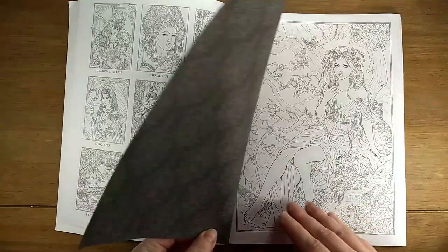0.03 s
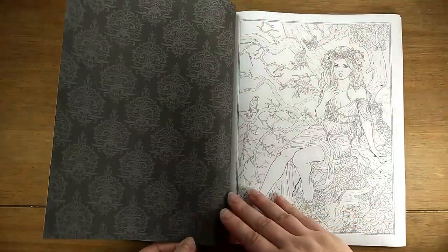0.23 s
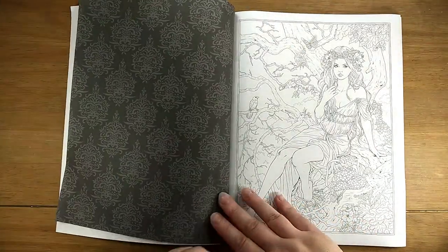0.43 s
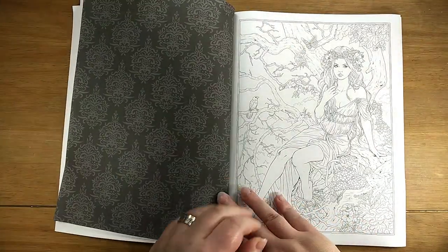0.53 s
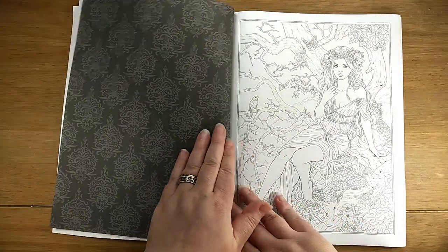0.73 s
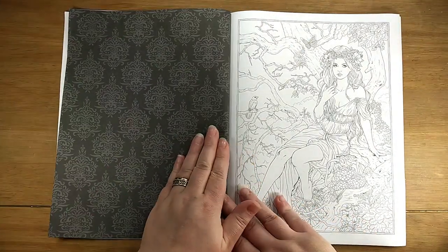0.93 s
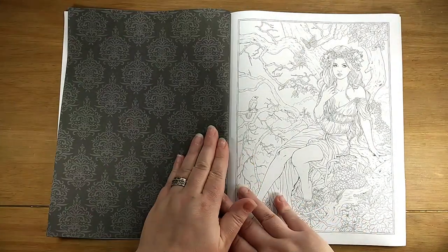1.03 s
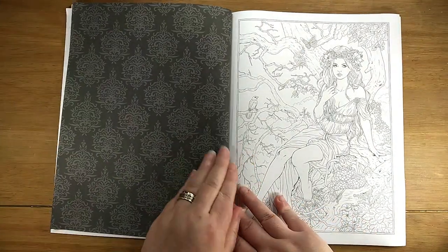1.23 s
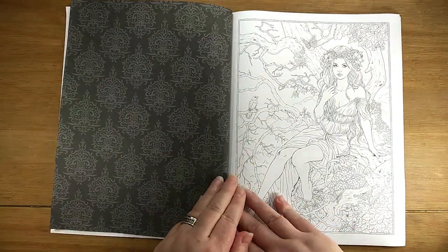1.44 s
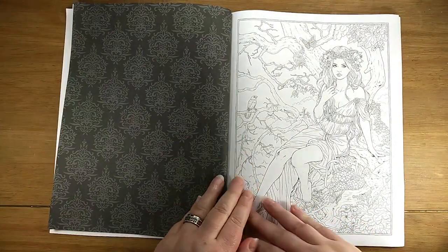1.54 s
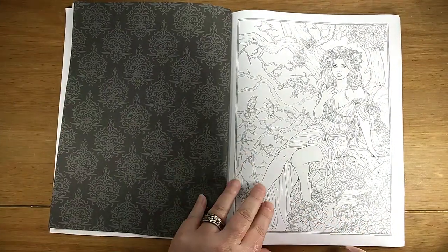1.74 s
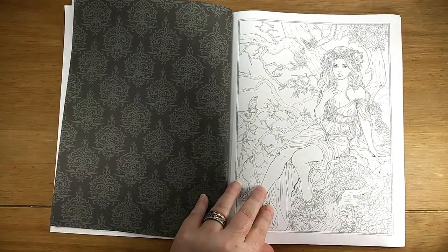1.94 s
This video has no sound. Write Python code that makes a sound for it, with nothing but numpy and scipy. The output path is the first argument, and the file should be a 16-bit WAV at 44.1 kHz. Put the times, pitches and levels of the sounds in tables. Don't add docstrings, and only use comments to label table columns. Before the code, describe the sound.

Page turn in a book: brief rustle, crisp tap, then light finger bumps and faint rubbing

```python
import sys
import numpy as np
from scipy import signal
from scipy.fft import rfft, irfft
from scipy.io import wavfile
from scipy.ndimage import uniform_filter1d

SR = 44100
rng = np.random.default_rng(int(sys.argv[2]) if len(sys.argv) > 2 else 0)


def put_to_file(sound):
    columns = np.atleast_2d(sound).T
    safe = np.clip(columns, -1, 1)
    whole_steps = np.round(safe * 32767)
    wavfile.write(sys.argv[1], SR, whole_steps.astype(np.int16))


def nominal_scale(level):
    x = np.asarray(level, float) / 20
    return 10 ** x


N = 88200

# frequency in Hz, density in dB per Hz.
AIR_SPECTRUM = [(30, -25.5), (80, -28.5), (300, -5), (600, -8.5), (1000, -11.5), (4500, -18.5),
                (7800, -31.5), (10000, -23.5)]
# frequency in Hz, density in dB per Hz.
SCRAPE_SPECTRUM = [(1200, -35), (2200, -6), (4000, -6), (4700, 1), (5300, -6), (6500, -4), (7500, -17),
                   (9000, -31)]
# frequency in Hz, density in dB per Hz.
SHEET_SPECTRUM = [(100, -43), (200, -13), (350, 3), (520, -4), (870, 5), (1150, 0.5), (1900, -1),
                  (3200, -21.5)]
# frequency in Hz, density in dB per Hz.
SKIN_SPECTRUM = [(6000, -20.5), (8000, -7.5), (9800, -1.5), (12500, -3.5), (16000, -8)]
# frequency in Hz, level in dB, T60 in seconds.
EDGE_MODES = [(1560, -2.5, 0.00433), (2156, -20, 0.0048), (2755, 3, 0.008), (3500, 8.5, 0.0056),
              (4536, -1.5, 0.0096), (5000, 2.5, 0.0046), (6200, -8, 0.0086), (7220, -16, 0.0031),
              (9600, -19, 0.0046)]
# start in seconds, peak in dB, pitch of
# the hollow in Hz, relative tick in dB.
CONTACTS = [(.098, -44.5, 334, -10), (.2038, -33.5, 406, -9), (.2255, -30, 1900, -5), (.2295, -31.5, 815, -17),
            (.2362, -72, 890, -3), (.243, -42, 1430, 1), (.302, -50.5, 1500, -1), (.355, -40.5, 794, -2),
            (.379, -25, 706, 16.5), (.38, -14, 1080, 1), (.3828, -28, 1000, 7.5), (0.3877, -32, 1040, 6),
            (0.3908, -35, 1377, 9), (0.3981, -32.5, 897, -7.5), (.468, -52, 725, 0.5), (.7434, -74, 910, -2),
            (.7572, -40, 776, -17), (.78, -44, 290, -9), (0.8588, -40, 1280, 4.5), (.8603, -36.5, 2420, -6),
            (.862, -38, 970, -0.5), (0.952, -54.5, 960, -26), (1.1676, -46.5, 1060, 0),
            (1.1802, -44.5, 1040, 6), (1.185, -42, 1010, -1), (1.2202, -42, 970, -18), (1.442, -53.5, 940, -3),
            (1.515, -56, 990, 12), (1.587, -52, 1040, -7), (1.789, -53, 1600, -4),
            (.2205, -38, 2170, 3),
    (.24, -41, 2300, -3),
    (.27, -50, 2620, 12),
    (1.413, -67, 2480, 10),
    (1.457, -66, 2500, 15),
    (1.469, -60.5, 2880, 11),
    (1.7905, -52.5, 2500, -9),
    (1.792, -56.5, 795, -12),
]
# time in seconds, level in dB, relative drumming of the sheet in dB, relative skin hiss in dB.
TURN_STROKES = [
    [(0, -64.5, -14.5, -9), (.05, -64, 4, -11), (.1, -61, -2, -4), (.14, -60, -4.5, -28),
     (.175, -66, -2.5, -3), (.197, -57, -2.5, -19)],
    [(.197, -52, -11, -18), (.204, -45, -9, -12), (.215, -43, -6.5, -10), (.232, -41.5, 6, -27.5),
     (.252, -47.5, -5, -9), (.29, -47.5, -13, -11), (.305, -52.5, 3.5, -8.5), (.35, -47.5, -7.5, -15),
     (.378, -63.5, 9.5, -27)],
    [(.4, -55, -13, -19), (.49, -75.5, -17, -18.5), (.56, -72, -0.5, -21.5), (.72, -83, 6, -16.5)],
]
# time in seconds, level in dB, relative drumming of the sheet in dB, relative skin hiss in dB.
SMOOTH_STROKES = [
    [(.7432, -50.5, -6, -16), (.752, -59.5, 2.5, -9), (.757, -50.5, -4.5, -11), (.778, -48.5, -6.5, -16),
     (.79, -51, -9, -12), (.802, -79.5, 8, -9), (.825, -62, 7, -25), (.855, -65, 4.5, -12),
     (.9, -76, 9, -12)],
    [(1.19, -61, -4, -9), (1.21, -70, 3.5, -5), (1.3, -63.5, -5.5, -4.5), (1.38, -70.5, 0, -2),
     (1.45, -64, -6, -11.5), (1.54, -65, 1, -5), (1.595, -65.5, -4, -5), (1.69, -68.5, -3, -0.5),
     (1.76, -73.5, -15, -11)],
]
# time in seconds, level in dB, relative drumming of the sheet in dB, relative skin hiss in dB.
SHIFT_STROKES = [
    [(1.03, -88, -5, -3), (1.05, -73.5, 4, -4), (1.16, -81, -2, -3)],
    [(1.76, -76, 2, -8), (1.8, -72, -2, -12), (1.9, -75.5, 5, -12), (1.92, -94, -1, -10)],
]


def unit(x):
    return x / np.sqrt(np.mean(x ** 2))


def bin_hz():
    return np.maximum(np.arange(N // 2 + 1) * SR / N, 1)


def colour(x, points):
    hz, db = np.array(points, float).T
    gain = nominal_scale(np.interp(np.log(bin_hz()), np.log(hz), db))
    return irfft(rfft(x) * gain, N)


def walk(rate):
    hold = int(SR / rate)
    steps = rng.standard_normal(N)[np.arange(N) // hold]
    return 0.82 * uniform_filter1d(uniform_filter1d(steps, hold), hold)


def uneven_sizes(spread_db, count):
    chance = rng.random((2, count))
    return nominal_scale(-spread_db * np.log(chance[0] + 1e-9)) * np.sign(chance[1] - 0.5)


def air():
    level_db, swell_db, flicker_db = -65, 0.2, 1.93
    swell = walk(3.42)
    octaves = np.log2(bin_hz())
    out = np.zeros(N)
    for octave in np.arange(4, 15):
        share = np.cos(np.pi / 2 * np.clip(octaves - octave, -1, 1))
        noise = colour(rng.standard_normal(N), AIR_SPECTRUM)
        band = irfft(rfft(noise) * share, N)
        out += band * nominal_scale(swell_db * swell + flicker_db * walk(6.7))
    return unit(out) * nominal_scale(level_db)


def room(x):
    level_db, t60_s, gap_s, spread_db = -7, 0.14, 0.00194, 3.0
    low_hz, top_hz = 1600, 7640
    t = np.arange(SR // 2) / SR
    echo = uneven_sizes(spread_db, len(t)) * (t > gap_s) * nominal_scale(-60 * t / t60_s)
    echo = unit(echo) / np.sqrt(len(t))
    absorb = signal.butter(1, [low_hz, top_hz], "band", fs=SR, output="sos")
    echo = signal.sosfilt(absorb, echo)
    return nominal_scale(level_db) * signal.fftconvolve(x, echo)[:N]


def hollow_thump(t, hz):
    rise_s, t60_s = 0.00089, 0.0051
    thump = (1 - np.exp(-t / rise_s)) * nominal_scale(-60 * t / t60_s) * np.sin(2 * np.pi * hz * t)
    return thump / thump.max()


def edge_tick(t, chance):
    rise_s = 0.0001
    tick = np.zeros(len(t))
    for (hz, db, t60_s), vary in zip(EDGE_MODES, chance):
        decay = nominal_scale(db + 1.15 * vary - 60 * t / t60_s)
        tick += decay * np.sin(2 * np.pi * hz * (1 + 0.031 * vary) * t)
    return tick * (1 - np.exp(-t / rise_s)) ** 2


def taps():
    low_hz, top_hz = 281, 9100
    t = np.arange(2048) / SR
    out = np.zeros(N + len(t))
    contacts = CONTACTS
    chance = rng.standard_normal((len(contacts), len(EDGE_MODES)))
    for (start_s, db, hz, tick_db), vary in zip(contacts, chance):
        tick = 0.34 * nominal_scale(tick_db) * edge_tick(t, vary)
        i = int(start_s * SR)
        out[i:i + len(t)] += nominal_scale(db) * (hollow_thump(t, hz) + tick)
    out = signal.sosfilt(signal.butter(4, low_hz, "high", fs=SR, output="sos"), out[:N])
    return signal.sosfilt(signal.butter(2, top_hz, fs=SR, output="sos"), out)


def slips():
    slips_per_s, spread_db, ring_s, ring_db = 11000, 2.19, 0.0022, -13
    happens = rng.random(N) < slips_per_s / SR
    grains = unit(happens * uneven_sizes(spread_db, N))
    t = np.arange(1024) / SR
    ring = rng.standard_normal(len(t)) * np.exp(-t / ring_s)
    return grains + nominal_scale(ring_db) * unit(signal.fftconvolve(grains, ring)[:N])


def rubbing(spectrum):
    patchy_db = 2
    return unit(colour(slips(), spectrum)) * nominal_scale(patchy_db * walk(79.2))


def sliding():
    t = np.arange(N) / SR
    scrape, sheet, skin = rubbing(SCRAPE_SPECTRUM), rubbing(SHEET_SPECTRUM), rubbing(SKIN_SPECTRUM)
    out = np.zeros(N)
    for stroke in TURN_STROKES + SMOOTH_STROKES + SHIFT_STROKES:
        s, db, drum_db, skin_db = np.array(stroke, float).T
        moving = (t >= s[0]) * (t < s[-1])
        rub = nominal_scale(np.interp(t, s, db)) * scrape
        rub += nominal_scale(np.interp(t, s, db + drum_db)) * sheet
        rub += nominal_scale(np.interp(t, s, db + skin_db)) * skin
        out += moving * rub
    return out


def scene():
    near = sliding() + taps()
    return (near + room(near) + air())[None]


def top_cut(x):
    return signal.sosfilt(signal.butter(12, 16250, fs=SR, output="sos"), x)


def record(dry):
    low_cut_hz, top_hz = 74, 15750
    x = signal.sosfilt(signal.butter(1, low_cut_hz, "high", fs=SR, output="sos"), dry)
    x = signal.sosfilt(signal.ellip(10, 0.2, 70, top_hz, fs=SR, output="sos"), x)
    return top_cut(x)


dry = scene()
out = record(dry)
put_to_file(out)
```